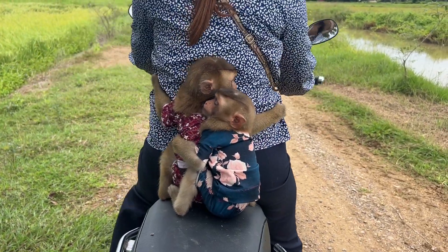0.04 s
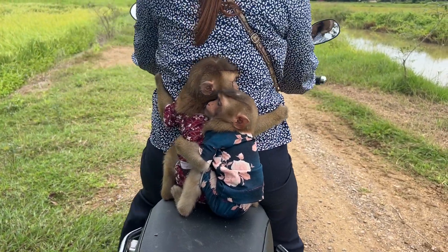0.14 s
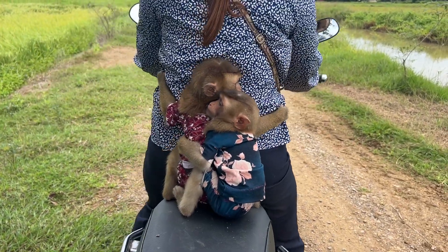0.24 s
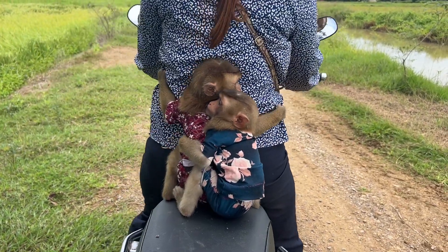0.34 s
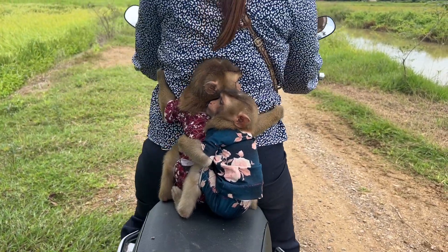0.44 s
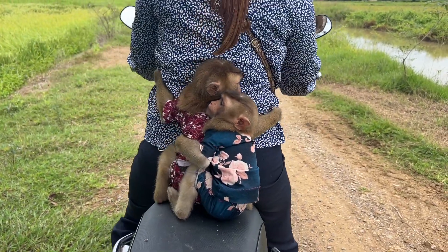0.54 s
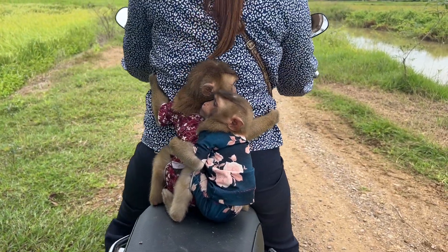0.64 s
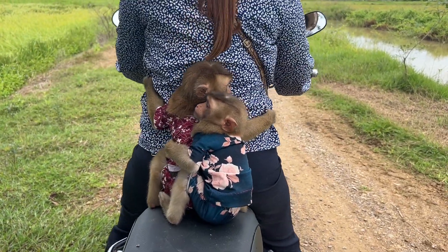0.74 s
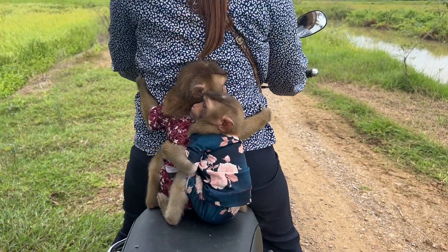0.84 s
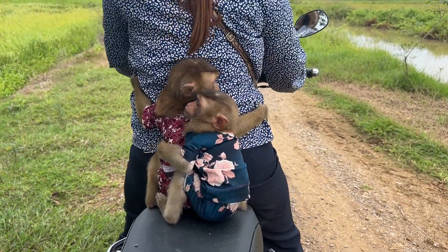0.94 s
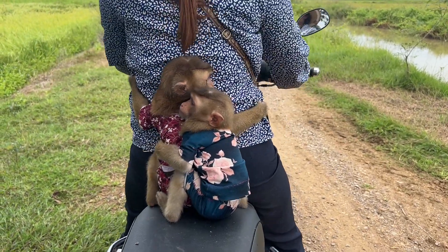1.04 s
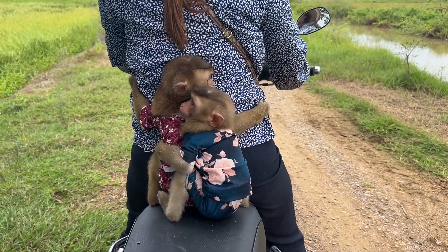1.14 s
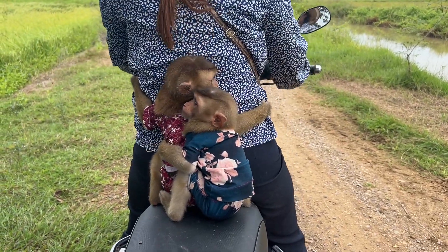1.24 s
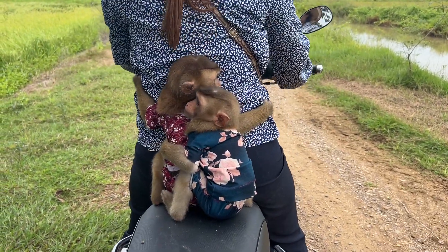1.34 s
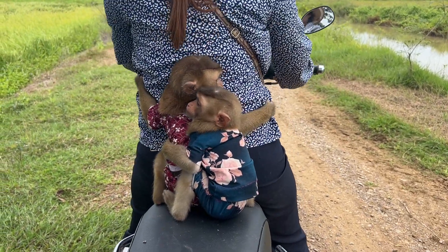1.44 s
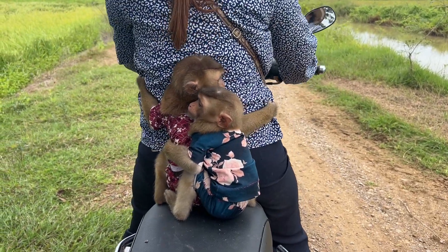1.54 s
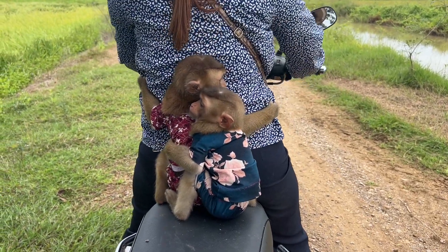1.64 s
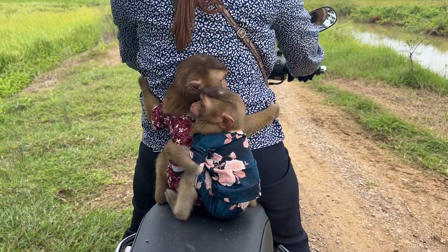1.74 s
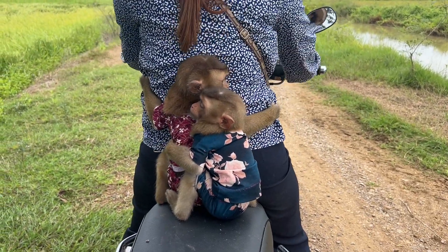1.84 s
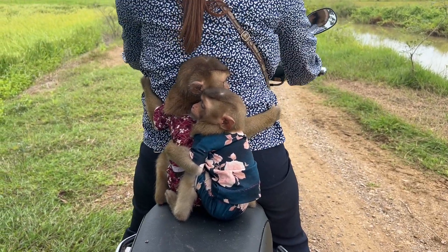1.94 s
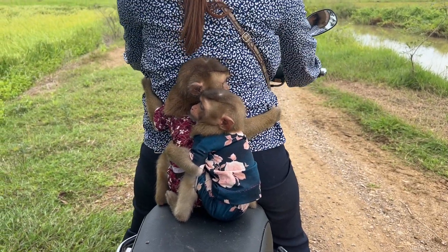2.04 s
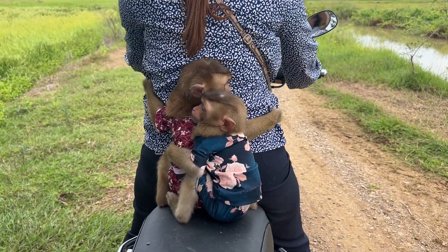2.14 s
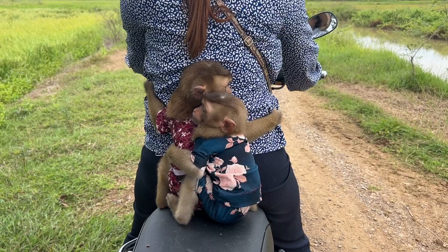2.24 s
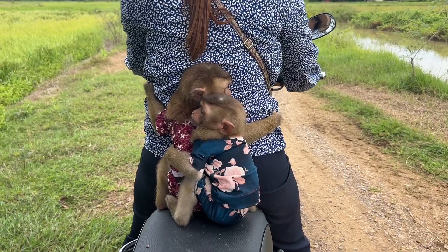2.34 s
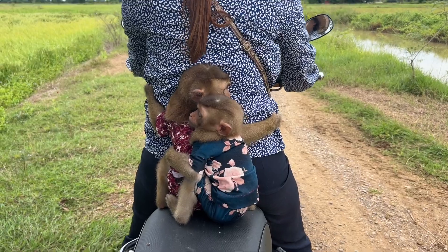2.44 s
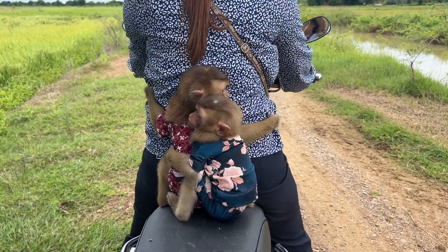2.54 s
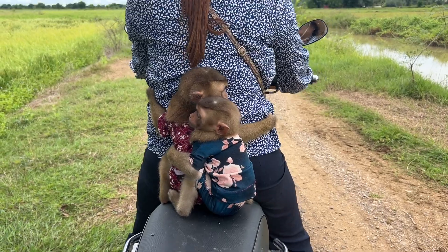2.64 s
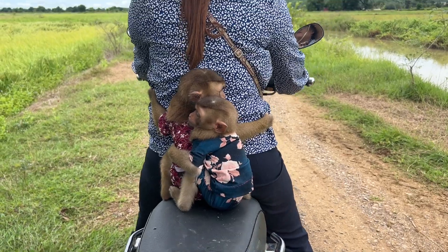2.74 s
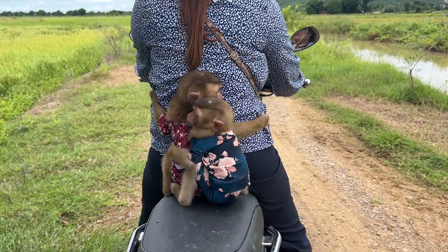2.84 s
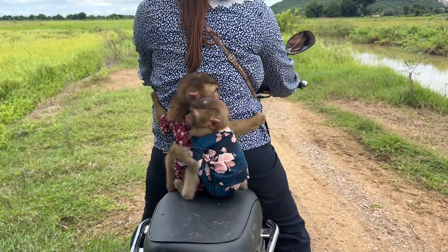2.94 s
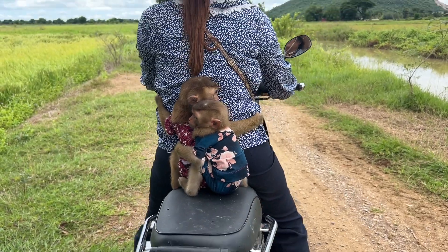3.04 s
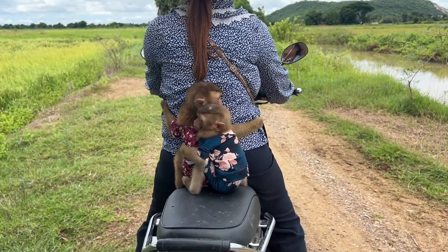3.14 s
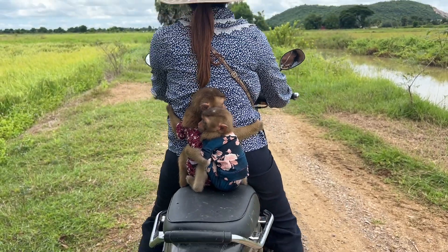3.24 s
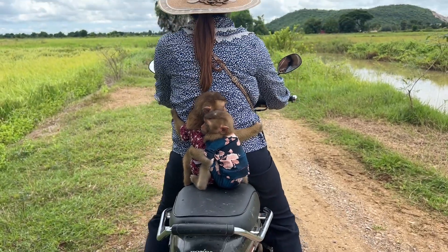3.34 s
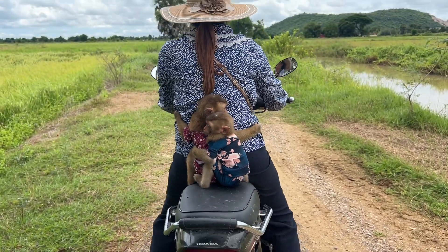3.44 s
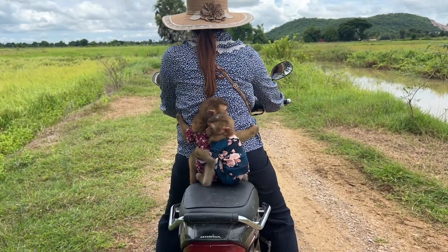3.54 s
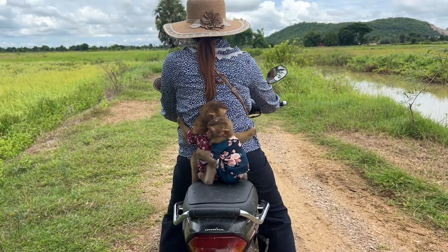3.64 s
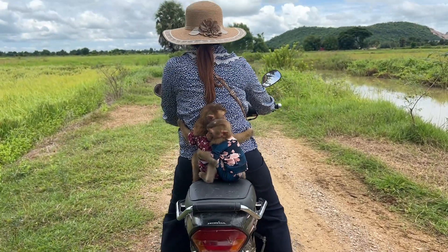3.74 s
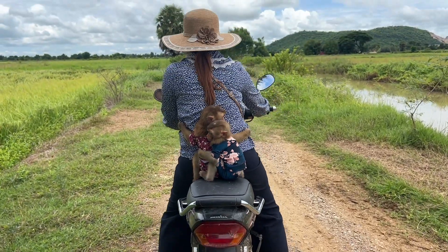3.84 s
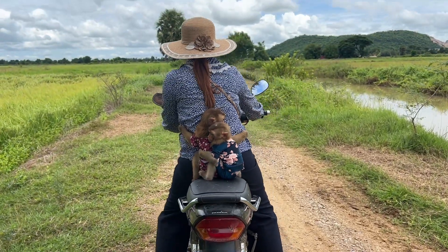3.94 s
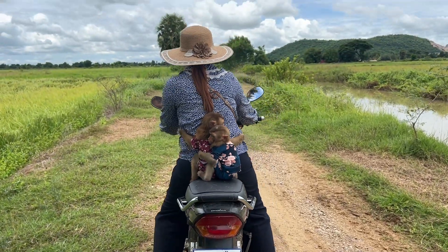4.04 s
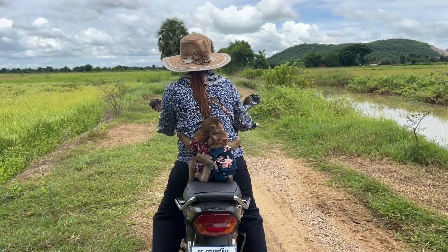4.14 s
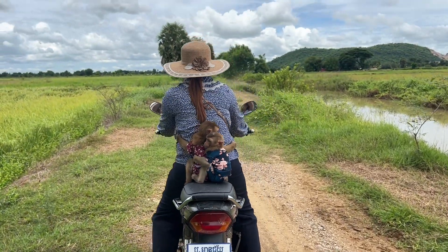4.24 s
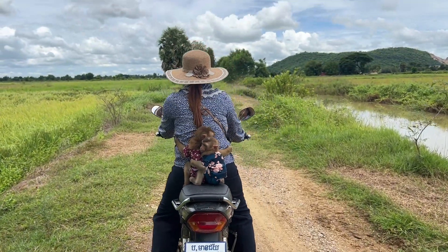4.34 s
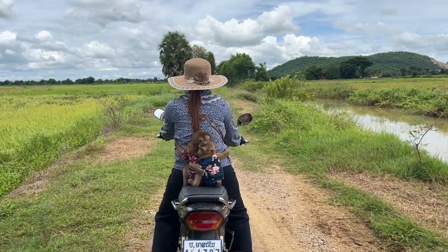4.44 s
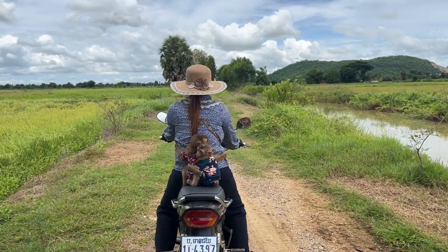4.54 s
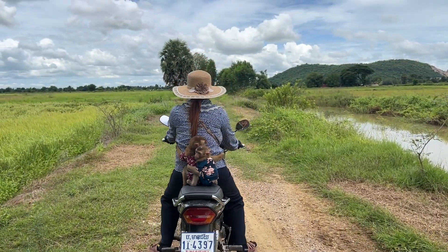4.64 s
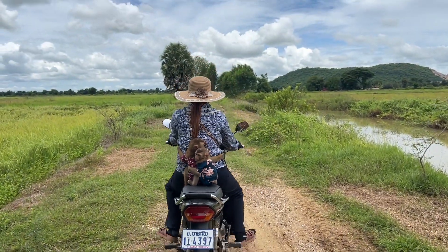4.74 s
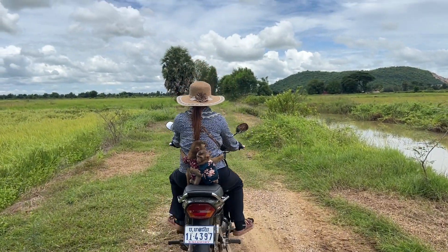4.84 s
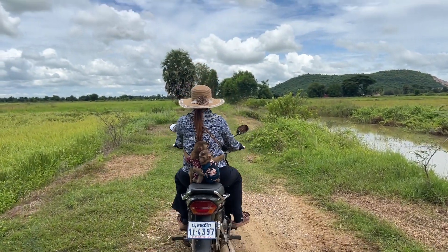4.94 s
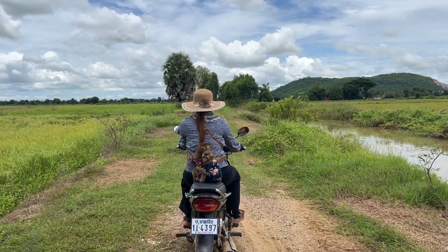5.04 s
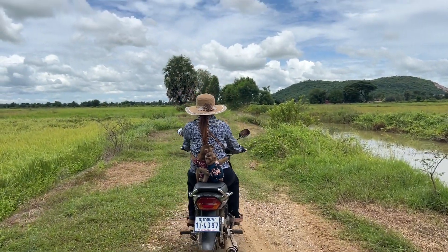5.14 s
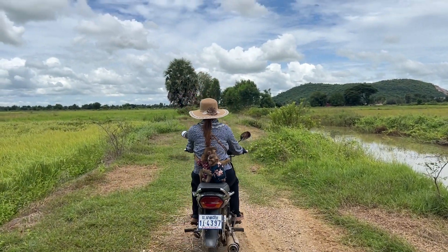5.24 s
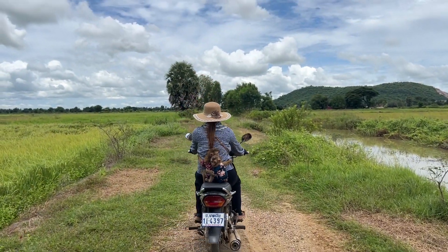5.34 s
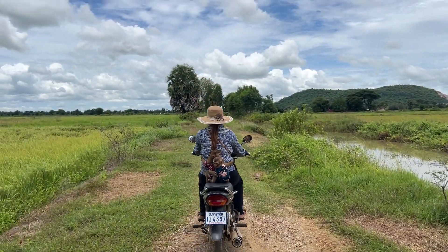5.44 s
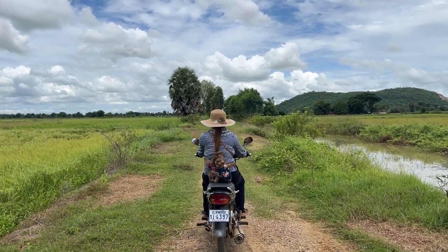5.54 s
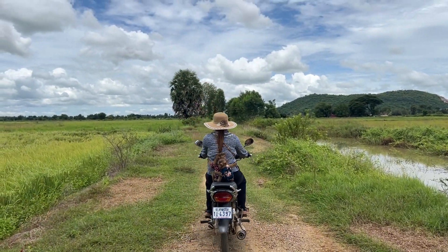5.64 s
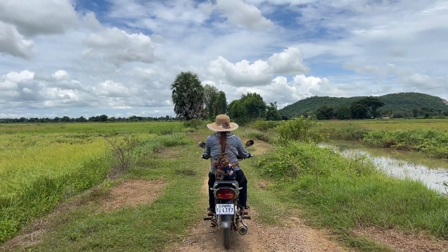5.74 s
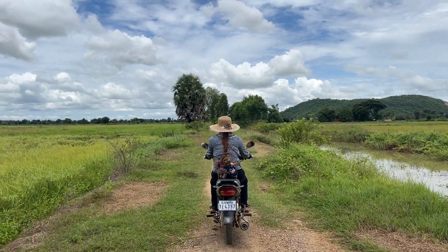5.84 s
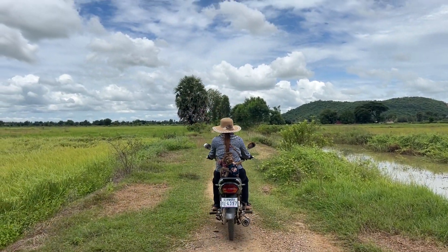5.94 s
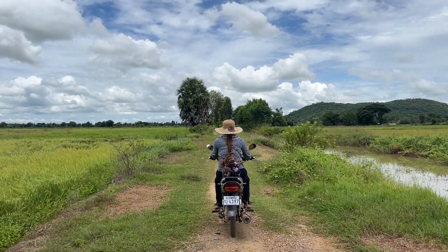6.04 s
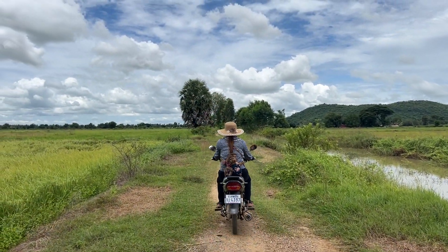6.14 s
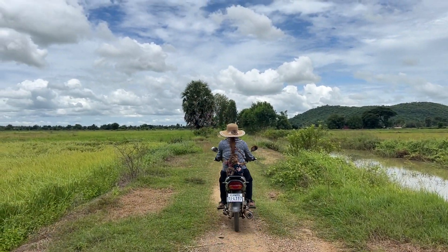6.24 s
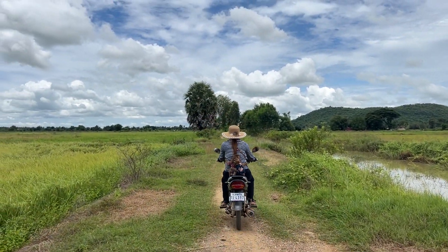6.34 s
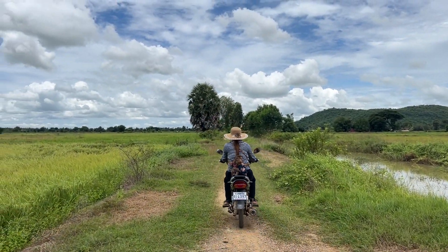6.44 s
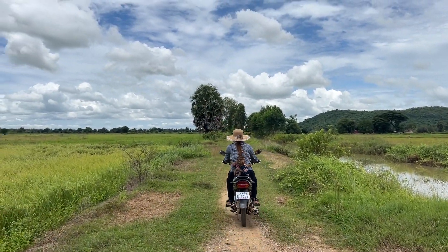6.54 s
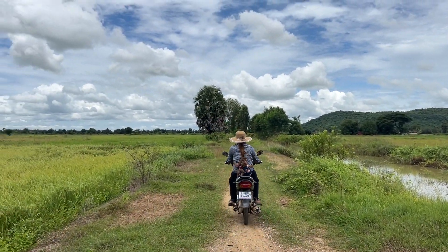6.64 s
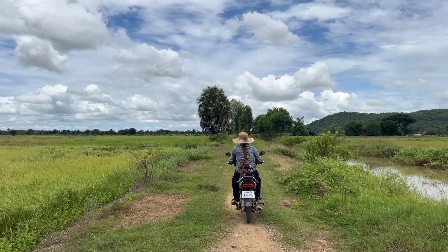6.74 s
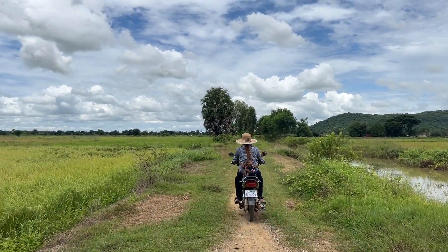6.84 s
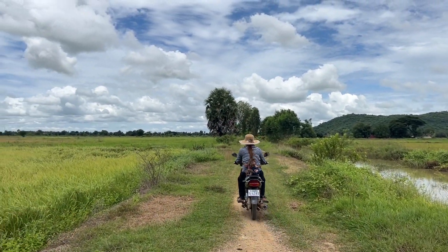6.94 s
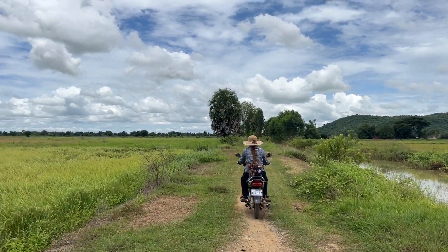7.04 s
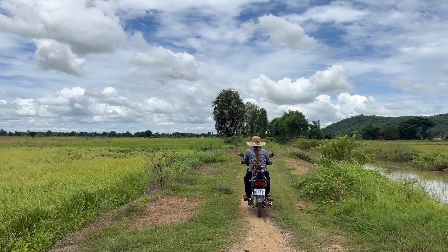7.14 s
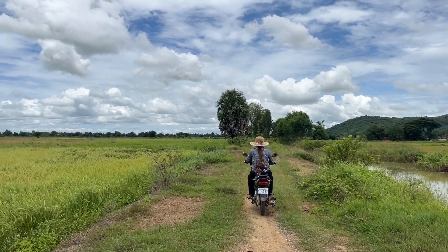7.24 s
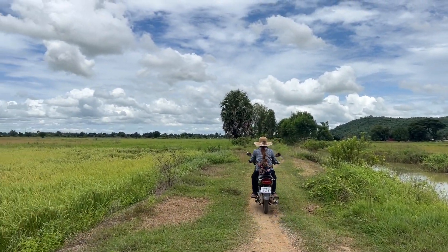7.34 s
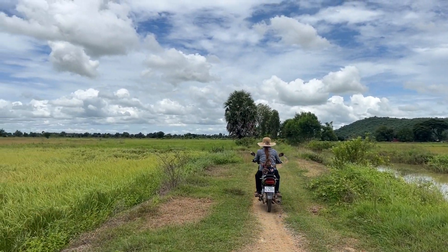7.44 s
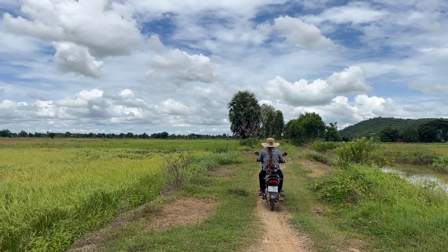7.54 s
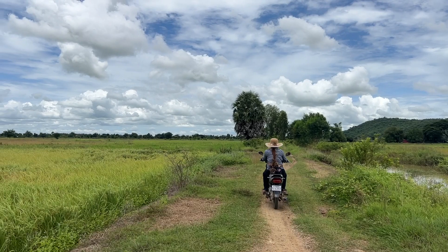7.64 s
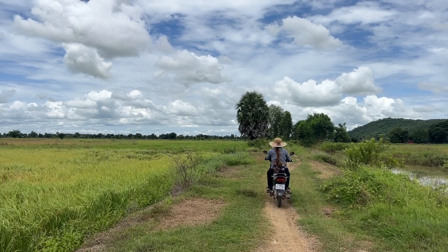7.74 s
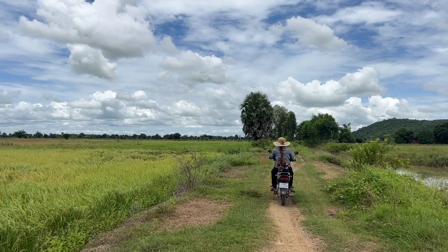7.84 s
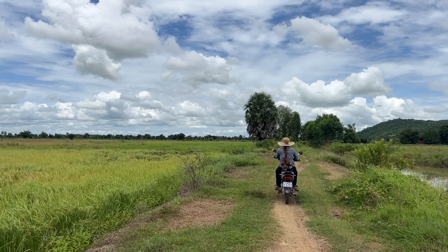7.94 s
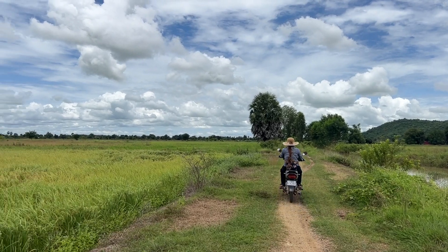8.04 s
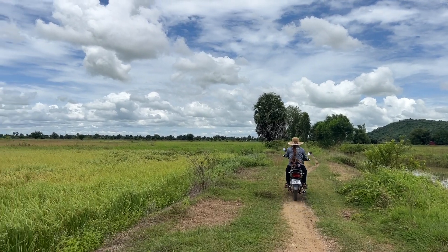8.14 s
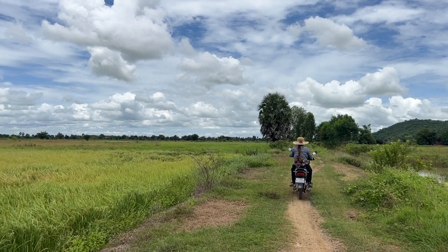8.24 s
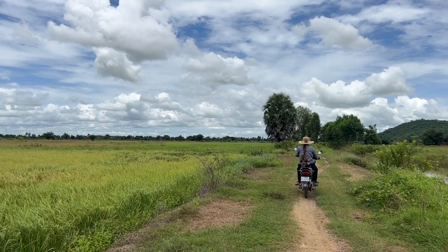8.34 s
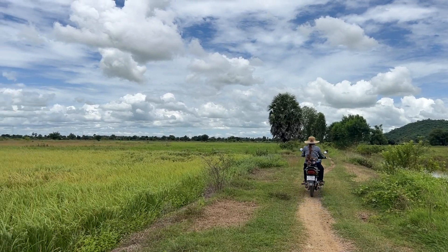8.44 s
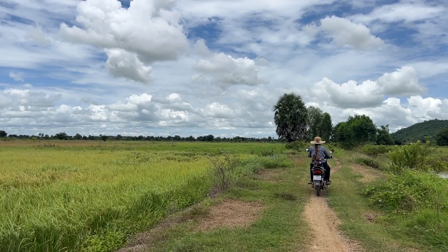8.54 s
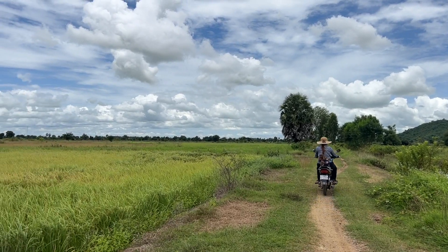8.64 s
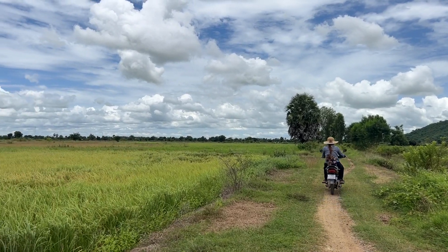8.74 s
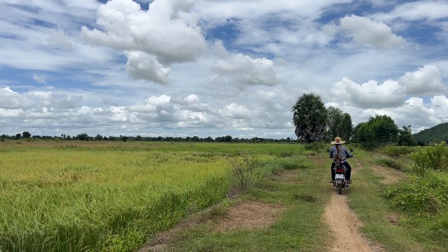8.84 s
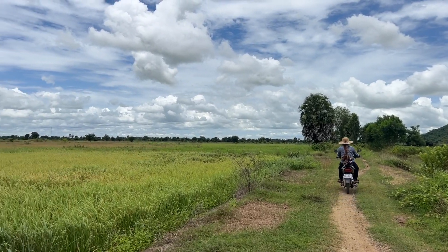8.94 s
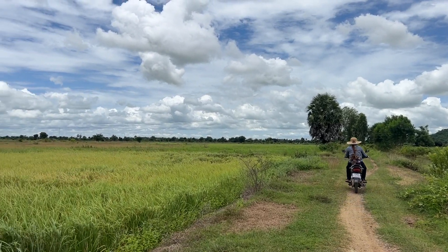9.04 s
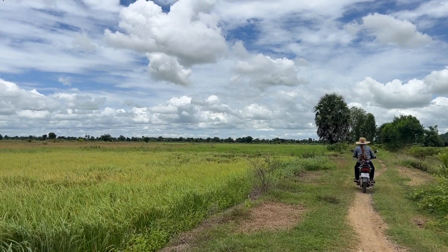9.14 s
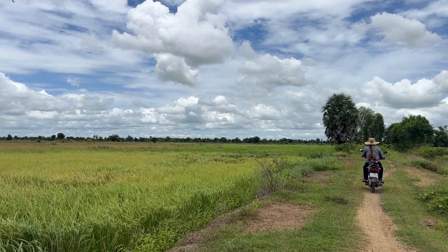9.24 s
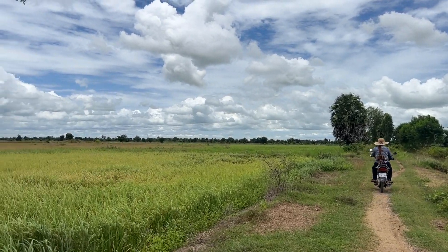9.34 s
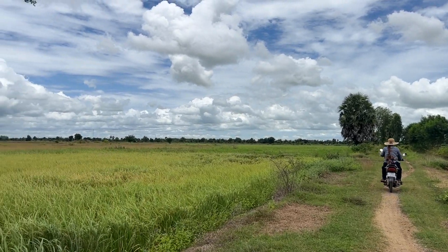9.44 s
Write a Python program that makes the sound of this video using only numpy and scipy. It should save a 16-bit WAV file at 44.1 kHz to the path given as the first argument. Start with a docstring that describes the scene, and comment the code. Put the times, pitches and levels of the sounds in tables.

```python
"""A dirt track between open fields, a stereo microphone 1.4 m from a small four-stroke single motorcycle.
Controls click, clothes rustle, something electric whines; the starter whirrs and the engine catches,
each firing a putt through the silencer. The bike rides off under throttle, stones cracking under its
tyres. Further off it coasts with uneven firing, gets one more nudge of throttle and is 16 m away by
the end, while a bird chirps faintly in pairs."""
import sys
import numpy as np
from scipy import signal
from scipy.fft import rfft, irfft
from scipy.io import wavfile

SR = 44100
rng = np.random.default_rng(int(sys.argv[2]) if len(sys.argv) > 2 else 0)


def inscribe(sig):
    """Save sig as 16-bit PCM at rate SR to the path in sys.argv[1].

    A 1-D sig is mono; a 2-D sig holds one channel per row.
    Samples are clipped to [-1, 1] before scaling.
    """
    pcm = np.round(np.clip(np.atleast_2d(sig).T, -1, 1) * 32767)
    wavfile.write(sys.argv[1], SR, pcm.astype(np.int16))


N = 418950
TIME, FREQS = np.arange(N) / SR, np.maximum(np.arange(N // 2 + 1) * SR / N, 1)

# Resonances of the silencer pipe. Each row: frequency in Hz, width in Hz, lift in dB.
PIPE_MODES = [(341.4, 23, 9.5), (457, 31, 7.5), (547, 58, 11.5), (843, 71, 11.5)]
# Bright hiss of gas or sliding cloth. Each row: frequency in Hz, relative level in dB.
HISS_SPECTRUM = [(800, -15), (2000, 9.5), (3500, 1.5), (5200, 1), (6500, 2.5), (8500, 4.5), (12000, 0.5),
                 (16000, -6.5)]
# Dull rustle. Each row: frequency in Hz, relative level in dB.
RUSTLE_SPECTRUM = [(47, -59), (80, -20), (212, -5.5), (333, 0), (838, -7), (1100, -9.5), (3130, -23),
                   (6000, -33), (7800, -41), (13200, -120)]


def from_db(db):
    """Decibels to gain."""
    return np.exp(np.asarray(db) * (np.log(10) / 20))


def rms_one(x):
    """Scale to unit rms."""
    return x / np.sqrt(np.mean(x ** 2) + 1e-20)


def in_time(rows):
    """Each column of a curve at every sample."""
    s, *columns = np.transpose(rows)
    return [np.interp(TIME, s, c) for c in columns]


def during(start, end, fade):
    """1 from start to end, fading out on both sides."""
    return np.clip(1 + np.minimum(TIME - start, end - TIME) / fade, 0, 1)


def swell(start, end, rise, fall_db_per_s):
    """Rise, hold until the end, then die away."""
    return np.clip((TIME - start) / rise, 0, 1) * from_db(-fall_db_per_s * np.maximum(TIME - end, 0))


def at_hz(points):
    """A short spectrum at every frequency."""
    hz, value = np.transpose(points)
    return np.interp(np.log(FREQS), np.log(hz), value)


def humps(modes):
    """Resonance peaks or hollows in dB at every frequency."""
    return sum(db / (1 + (2 * (FREQS - hz) / width) ** 2) for hz, width, db in modes)


def drift(rate):
    """A random wander of rms 1, with `rate` turns a second."""
    knots = rng.standard_normal(int(N / SR * rate) + 2)
    return rms_one(np.interp(TIME * rate, np.arange(len(knots)), knots))


def noise(spectrum, modes=(), grain_db=0):
    """Coloured stereo noise of rms 1; grain makes it a stream of uneven tiny impacts."""
    # How alike the two microphone ports hear it. Each row: frequency in Hz, correlation.
    likeness = [(100, .99), (500, .95), (1000, .82), (2000, .72), (4000, .65), (8000, .85)]
    alike = np.clip(at_hz(likeness), 0, 1)
    mid, side = rfft(rng.standard_normal((2, N)) * from_db(grain_db * np.clip(drift(900), -2.5, 2.5)))
    pair = np.sqrt(1 + alike) * mid + np.sqrt(1 - alike) * side * [[1], [-1]]
    return rms_one(irfft(pair * from_db(at_hz(spectrum) + humps(modes)), N))


def resonate(x, kind, hz, q):
    """Second-order low- or band-pass."""
    w = 2 * np.pi * hz
    top = {"low": [w * w], "band": [w / q, 0]}[kind]
    return signal.lfilter(*signal.bilinear(top, [1, w / q, w * w], SR), x + 1e-18)


def ring(clicks, hz, t60):
    """A unit click sets a sine of height 1 ringing."""
    r, w = from_db(-60 / (t60 * SR)), 2 * np.pi * hz / SR
    return signal.lfilter([0, np.sin(w)], [1, -2 * r * np.cos(w), r * r], clicks + 1e-18)


def bursts(clicks, rise, decay):
    """Each click opens an envelope that rises quickly and dies away."""
    up, down = np.exp(-1 / (rise * SR)), np.exp(-1 / (decay * SR))
    return signal.lfilter([1 - up], [1, -up - down, up * down], clicks + 1e-18)


def stroke(cycles, share):
    """A unit click whenever the four-stroke cycle passes the given point."""
    return np.diff(np.floor(cycles - share), prepend=np.floor(cycles[0] - share)) * (cycles > 0)


def knocks(rows, decay, q, snap_decay):
    """Short cracks, each a bright snap and a body coloured by one broad resonance."""
    out, grit = np.zeros((2, N)), noise([(100, 0), (16000, 0)], grain_db=1.0)
    for s, peak_db, hz, snap_db in rows:
        i = int(s * SR)
        piece = grit[:, i:i + SR // 10]
        age = TIME[:piece.shape[1]]
        body = resonate(piece * np.exp(-age / decay), "band", hz, q)
        body = resonate(body, "low", 2 * hz, 0.64)
        snap = piece * np.exp(-age / snap_decay) * from_db(snap_db)
        out[:, i:i + len(age)] += body / np.abs(body).max() * from_db(peak_db) + snap
    return out


def field_air():
    """Still air over the fields, a faint low rumble."""
    # Each row: frequency in Hz, relative level in dB.
    spectrum = [(20, -14), (45, 2), (85, -5.5), (200, -9), (750, -19), (1200, -26), (4000, -34.5),
                (8300, -48.5), (16000, -56)]
    return from_db(-60.5) * noise(spectrum)


def bird(chirp_s=0.021, spacing_s=0.075, start_hz=6730, end_hz=8100):
    """Pairs of thin, slightly wavering, rising chirps."""
    # Each row: start of a pair in seconds, level in dB.
    calls = [(6.44, -65), (7.915, -72), (8.638, -62)]
    out, along = np.zeros(N), np.linspace(0, 1, int(chirp_s * SR))
    wobble = 1 + 0.022 * drift(480)
    for s, db in calls:
        for start in (s, s + spacing_s):
            span = int(start * SR) + np.arange(len(along))
            hz = (start_hz + (end_hz - start_hz) * along) * wobble[span]
            out[span] += from_db(db) * np.sin(np.pi * along) * np.sin(2 * np.pi * np.cumsum(hz) / SR)
    return out


def clothes():
    """Cloth rubs on the seat as the rider shifts."""
    # Each row: start and end in seconds, rustle level in dB, swish level in dB.
    shifts = [(-.02, 0.013, -56, -74), (0.201, 0.288, -46, -50.5), (0.335, 0.399, -50.5, -65),
              (0.735, 0.792, -65, -58), (.84, 0.857, -58, -87)]
    rustle, swish = noise(RUSTLE_SPECTRUM, grain_db=3.5), noise(HISS_SPECTRUM, grain_db=2.0)
    return sum(swell(start, end, rise=0.031, fall_db_per_s=222)
               * (from_db(rustle_db) * rustle + from_db(swish_db) * swish)
               for start, end, rustle_db, swish_db in shifts)


def low_thumps():
    """A few soft, low thumps before the engine starts."""
    # Each row: start in seconds, pitch in Hz, level in dB.
    thumps = [(0.179, 72, -43.5), (0.572, 93, -46), (.64, 85, -48.5), (1.041, 79, -44.5)]
    out = np.zeros(N)
    for s, hz, db in thumps:
        push = 1.0 * (np.arange(N) == int(s * SR))
        out += from_db(db) * resonate(ring(push, hz, t60=0.18), "low", 2 * hz, 0.98)
    return out


def electric_whine(hz=842):
    """Something electric whines for a moment before the start, a rough tone with some noise in it."""
    # Each row: harmonic number, relative level in dB.
    partials = [(1, 4), (2, -8), (3, -32), (4, -16), (6, -33), (7, -26)]
    phase = 2 * np.pi * np.cumsum(hz * (1 + 0.017 * drift(370))) / SR
    tone = rms_one(sum(from_db(db) * np.sin(k * phase) for k, db in partials))
    whine = tone + from_db(-5.5) * noise(RUSTLE_SPECTRUM, grain_db=3.5)
    return whine * from_db(-49.5) * swell(0.657, 0.731, rise=0.018, fall_db_per_s=200)


def controls():
    """The controls click close to the microphone."""
    # Each row: start in seconds, body peak in dB, centre in Hz, snap level in dB.
    clicks = [(0.175, -35, 1010, -57), (0.229, -36, 990, -54), (0.278, -42, 1200, -36),
              (0.347, -37, 1590, -55), (0.416, -33.5, 1130, -45), (0.445, -37.5, 1010, -44),
              (0.466, -42, 1050, -41), (0.497, -38.5, 1500, -48), (1.115, -51, 1940, -74)]
    return knocks(clicks, decay=0.011, q=1.6, snap_decay=0.0022)


def tyres(patch_s=(6.01, 6.2), count=9):
    """Stones crack under the tyres; in one loose patch of gravel, bigger ones are louder and lower."""
    # The larger stones. Each row: start in seconds, body peak in dB, centre in Hz, snap level in dB.
    stones = [(3.1111, -20, 1500, -22), (4.2413, -24, 1240, -34), (4.4901, -48, 1400, -31),
              (4.9194, -30, 1500, -31.5), (4.948, -25, 1293, -40), (4.956, -25, 1280, -32),
              (5.0212, -29.5, 1400, -43), (5.911, -37.5, 2300, -47), (5.9897, -38, 1293, -40),
              (6.0676, -33, 1300, -48), (6.3967, -40, 3300, -41), (6.6735, -37.5, 2510, -43),
              (8.138, -47, 2600, -52), (8.41, -46, 3640, -37), (8.589, -44.5, 1260, -62),
              (8.9085, -42.5, 1240, -62)]
    times, sizes = rng.uniform(*patch_s, count), rng.standard_normal(count)
    gravel = [(s, -41.5 + 5.5 * size, 1770 * 2 ** (-0.4 * size), -58) for s, size in zip(times, sizes)]
    return knocks(list(stones) + gravel, decay=0.0058, q=1.5, snap_decay=0.00068)


def starter(on_s=1.181, off_s=1.402):
    """The gear growls up in pitch as it turns the engine, then the motor spins down in its housing."""
    # The gear under load. Each row: time in seconds, mesh frequency in Hz, level in dB.
    gear = [(1.19, 606, -76), (1.241, 812, -27), (1.28, 847, -42), (1.305, 1343, -37), (1.336, 1430, -27),
            (1.37, 1320, -49), (1.421, 1307, -78)]
    # The motor's whirr. Each row: frequency in Hz, relative level in dB.
    spectrum = [(150, -11.5), (400, 4), (700, 1), (1100, -1.5), (2000, 5), (2900, -5), (4300, -0.5),
                (5800, -12), (8500, -9), (12000, -13), (16000, -26)]
    # Housing resonances. Each row: frequency in Hz, width in Hz, lift in dB.
    housing = [(864, 76, 14), (1320, 52, 14), (1430, 81, 13), (1790, 41, 11), (1995, 66, 8.5),
               (2115, 110, 6), (2500, 34, 12.5), (3300, 120, 10.5), (3790, 60, 5), (6870, 67, 15.5)]
    hz, mesh_db = in_time(gear)
    phase = 2 * np.pi * np.cumsum(hz * (1 + 0.0507 * drift(500))) / SR
    mesh = rms_one(np.sin(phase) + 0.24 * np.sin(2 * phase) + 0.061 * np.sin(3 * phase))
    growl = mesh * from_db(mesh_db + 2 * drift(300)) * during(gear[0][0], gear[-1][0], 0.01)
    strain = np.exp(-((TIME - 1.332) / 0.03) ** 2)  # the last compression before the engine catches
    effort = from_db(-35 + 10.5 * strain) * swell(on_s, off_s, rise=0.035, fall_db_per_s=18.5)
    return growl + effort * noise(spectrum, housing, grain_db=2.5)


def outlet_chuff(fired, puff_db):
    """A thin metallic chuff at the outlet as the bike rides away; it carries further than the putts."""
    # Each row: frequency in Hz, relative level in dB.
    spectrum = [(3000, -18), (4200, -8.5), (4850, 3), (5400, -3), (6300, -36)]
    chuffs = fired * from_db(0.84 * puff_db - 44 + 2 * drift(20)) * during(3.1, 8.16, 0.6)
    return bursts(chuffs, rise=0.00058, decay=0.022) * noise(spectrum)


def metal_clack(fired, puff_db):
    """Every firing strikes each metal mode with a strength of its own."""
    # Each row: frequency in Hz, level relative to the puff in dB, seconds to fall by 60 dB.
    modes = [(843, -40, 0.14), (1390, -39, 0.037), (1836, -36, 0.045), (2395, -42, 0.078),
             (2530, -61.5, 0.027), (3564, -40, 0.032), (4080, -57, 0.014), (5080, -49.5, 0.025),
             (5080, -54, 0.027), (5600, -50, 0.041)]
    return sum(ring(fired * from_db(puff_db + db + 2 * drift(40)), hz, t60) for hz, db, t60 in modes)


def valve_hiss(cycles):
    """The valve cracks open with a sharp spit; a weaker one comes as the piston drives out the rest."""
    cracks = (stroke(cycles, 0.96) + 0.24 * stroke(cycles, 0.27)) * from_db(3.04 * drift(30))
    spit = bursts(cracks, rise=0.00063, decay=0.0059)
    tail = 0.071 * bursts(cracks, rise=0.002, decay=0.038)
    return rms_one(spit + tail + 0.013 * (cycles > 0)) * noise(HISS_SPECTRUM, grain_db=2.5)


def valve_clatter(cycles, fired):
    """Valves seat at fixed points of the cycle and each firing knocks, over steady chain noise."""
    # Each row: frequency in Hz, relative level in dB.
    spectrum = [(120, 7), (250, 10.5), (420, -4.5), (700, -0.5), (1100, -3), (1600, -12), (2200, -17),
                (2900, -20), (3700, -20.5), (5000, -31.5), (8000, -31.5), (16000, -30)]
    # Peaks and hollows of the engine casing. Each row: frequency in Hz, width in Hz, gain in dB.
    casing = [(514, 65, 4.5), (859, 58, 7), (1400, 41, -1), (1870, 220, 5), (2680, 87, -16)]
    seats = sum(stroke(cycles, share) for share in (0.24, 0.34, 0.79)) * from_db(5.04 * drift(60))
    beat = rms_one(1 + 0.53 * bursts(seats, 0.00037, 0.015) + 0.58 * bursts(fired, 0.00073, 0.0037))
    return beat * noise(spectrum, casing, grain_db=2.0)


def pipe_rasp(puffs):
    """Turbulence in the pipe follows each puff."""
    # Each row: frequency in Hz, relative level in dB.
    spectrum = [(120, -12), (220, 9.5), (330, -6), (430, -6), (550, -7.5), (680, -11), (900, -12),
                (1500, -11.5), (3000, -24.5), (8000, -37)]
    return from_db(-22) * bursts(puffs, rise=0.0015, decay=0.019) * noise(spectrum, PIPE_MODES)


def sinking_booms(puffs, lag_hz=30, order=17):
    """Each putt is heard as a low boom that sinks in pitch."""
    # One putt. Each row: frequency in Hz, relative level in dB.
    spectrum = [(12, -58), (25, -65), (39, -9.5), (50, -12), (64, -2), (82, 2.5), (118, 0.5), (160, -12.5),
                (205, -19), (260, -36), (420, -39), (800, -44), (1500, -55), (4000, -76)]
    bass_delay = ((1 - 1j * FREQS / lag_hz) / (1 + 1j * FREQS / lag_hz)) ** order
    response = from_db(at_hz(spectrum) + humps(PIPE_MODES)) * bass_delay
    return irfft(rfft(puffs) * response, N) / np.abs(irfft(response, N)).max()


def exhaust_putts(puffs, cycles, shut, puff_db, boom_hz=51):
    """A shut throttle makes the puffs softer and deeper, and the intake gulps a quarter cycle later."""
    soft = 1.18 * resonate(puffs * shut, "low", 305, 0.3)
    boom = from_db(1.5) * resonate(soft, "band", boom_hz, 3.7)  # the silencer's deep resonance
    intake = stroke(cycles, 0.2654) * shut * from_db(puff_db - 13 + 2 * drift(28))
    gulps = resonate(intake, "low", 120, 0.61)
    return sinking_booms(puffs * (1 - shut) + soft + boom - gulps)


def lean_firings(cycles):
    """1 around every second firing of each coasting spell, beginning with its first."""
    # Each row: start and end in seconds.
    spells = [(5.97, 6.18), (6.36, 7.07), (7.84, 8.02), (8.5, 9.5)]
    parity = np.round(cycles).astype(int) % 2
    return sum((TIME > start) & (TIME < end) & (parity == np.ceil(cycles[int(start * SR)]) % 2)
               for start, end in spells)


def engine(idle_per_s=13.55, loaded_opening=0.66, roll_off_s=2.89):
    """One cylinder fires once a cycle; throttle and distance set the level of each of its sounds."""
    # Each row: time in seconds, firings per second.
    speed = [(1.368, 13.917), (1.578, 9.243), (2.092, 8.884), (2.243, 14.925), (2.391, 16.766),
             (2.747, 17.517), (2.975, 15.765), (3.451, 15.56), (5.478, 18.273), (5.741, 13.922),
             (5.848, 16.957), (6.025, 12.839), (6.544, 13.93), (7.15, 14.002), (7.329, 18.429),
             (7.491, 18.767), (8.301, 12.441), (9.5, 11.884)]
    # The ride away. Each row: time in seconds, distance from the microphone in metres.
    distance = [(2.7, 1.37), (3.2, 1.85), (4.3, 2.28), (5.1, 3.05), (5.7, 4.16), (7.0, 6.7), (7.7, 7.1),
                (8.5, 10.3), (9.5, 15.7)]
    # Twists of the throttle. Each row: start and end in seconds, opening from 0 to 1.
    twists = [(1.36, 1.38, 0.65), (2.2, 2.758, 0.98), (2.75, 5.595, 0.64), (7.2, 7.66, 0.6)]
    per_s, = in_time(speed)
    metres, = in_time(distance)
    caught_s = speed[0][0]
    cycles = np.cumsum(per_s * (TIME >= caught_s)) / SR - 1e-9  # below 0 until the first firing
    fired = stroke(cycles, 0)
    running = during(caught_s, TIME[-1], fade=0.025)
    rolling = during(roll_off_s, TIME[-1], fade=0.18)  # the clutch bites, the drive chain joins in
    throttle = np.max([opening * during(start, end, fade=0.1) for start, end, opening in twists], axis=0)
    shut = 1 - np.clip(throttle / loaded_opening, 0, 1)  # 0 under load: hard, even firing
    far_db = 20 * np.log10(metres[0] / metres)
    overrun_db = 0.84 * shut * np.maximum(per_s - idle_per_s, 0)  # coasting above idle weakens puffs
    puff_db = -10 + 3 * throttle + far_db - overrun_db
    lean_db = lean_firings(cycles) * (-6.5 + 4 * drift(30))
    uneven_db = shut * (0.14 + 0.81 * rolling) * drift(30)
    puffs = fired * from_db(puff_db + lean_db + uneven_db)
    putts = exhaust_putts(puffs, cycles, shut, puff_db)
    rasp = pipe_rasp(fired * from_db(puff_db + 0.2 * lean_db))
    chuff = outlet_chuff(fired, puff_db)
    clack = metal_clack(fired, puff_db)
    hiss = valve_hiss(cycles) * from_db(-53.5 + 7.5 * throttle + 2.02 * far_db)
    clatter = valve_clatter(cycles, fired) * from_db(-43 + 4 * throttle + 0.95 * far_db + 6 * rolling)
    return (putts + clatter) * running + rasp + chuff + clack + hiss


def scene():
    """The motorcycle straight ahead of the microphone in quiet open country."""
    motorcycle = controls() + tyres() + engine() + starter() + electric_whine()
    return motorcycle + clothes() + low_thumps() + bird() + field_air()


def record(dry, lead_samples=0.94, cutoff_hz=16200):
    """A microphone with two ports: hollows in the treble, the left slightly early, the top cut off."""
    # Hollows of the ports. Each row: frequency in Hz, width in Hz, gain in dB.
    hollows = [(10200, 634, -29), (13400, 510, -22)]
    # Balance. Each row: frequency in Hz, left minus right in dB.
    balance = [(100, -0.66), (350, -0.2), (700, -0.5), (1300, 0.2), (2400, 1.5), (4600, 6), (8000, 0.5)]
    colour = from_db(humps(hollows) + at_hz(balance) * [[0.5], [-0.5]])
    delay = np.exp(-2j * np.pi * FREQS / SR * lead_samples * np.array([[0], [1]]))
    heard = irfft(rfft(dry) * colour * delay, N)
    return signal.sosfilt(signal.ellip(10, 0.2, 80, cutoff_hz, fs=SR, output="sos"), heard)


dry = scene()
out = record(dry)
inscribe(out)
```